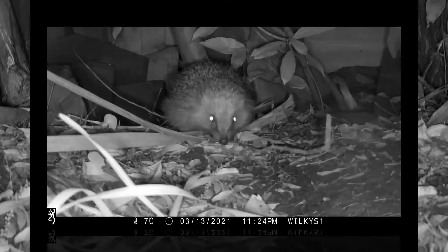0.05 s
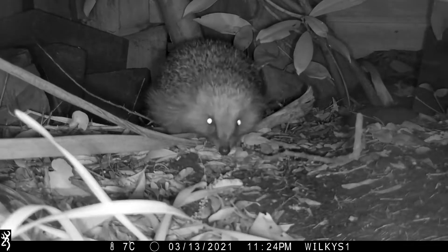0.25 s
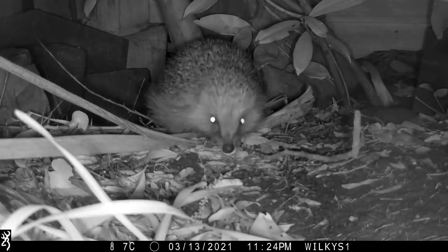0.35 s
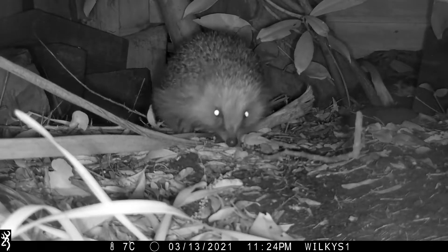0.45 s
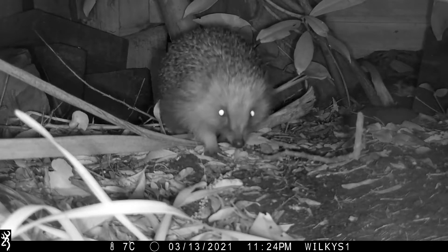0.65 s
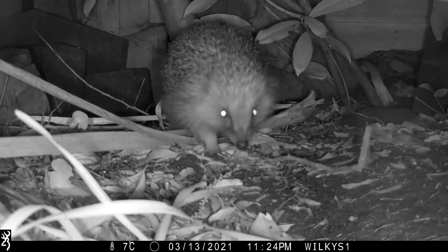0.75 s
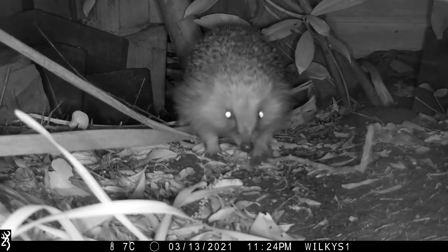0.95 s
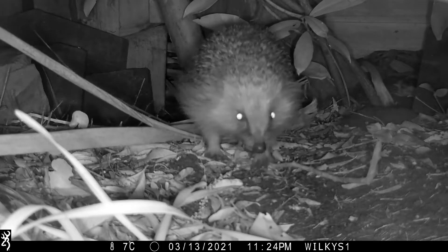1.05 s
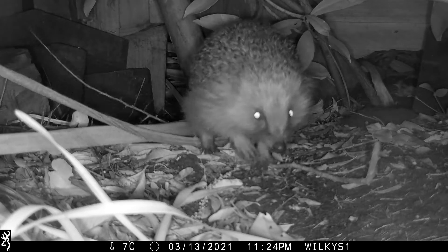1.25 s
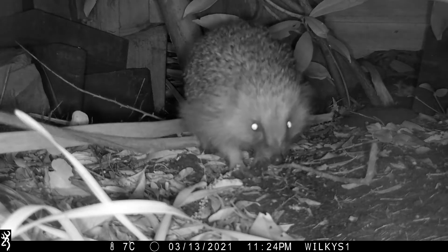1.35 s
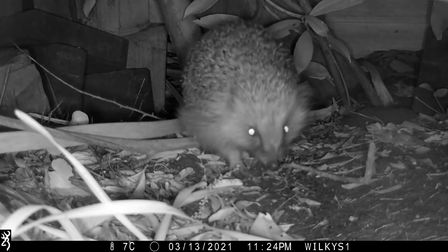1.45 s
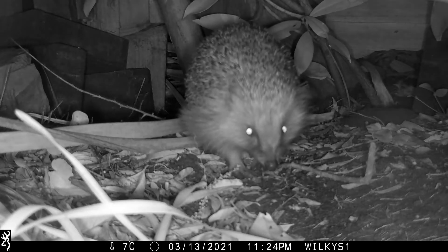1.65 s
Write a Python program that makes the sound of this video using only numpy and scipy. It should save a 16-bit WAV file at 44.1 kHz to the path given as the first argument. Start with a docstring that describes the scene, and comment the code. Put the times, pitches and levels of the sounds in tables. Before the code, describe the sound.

A hedgehog rustles through dry leaves close to a dull microphone. First a faint hiss fades, then cuts back in at about 0.2 seconds with a pop, a brief hum and a sharp click, and stays steady. From 0.3 to 0.9 seconds soft steps crackle, with tiny snaps and spines scraping leaves. After a short lull the rustling resumes around 1.1 seconds, peaks near 1.4 and thins out by 1.7.

```python
"""A hedgehog on dry leaf litter at night, close to a trail camera with a dull, hissy microphone.
The hiss fades away, then cuts back in with a pop, a brief hum and a sharp click, probably the camera's.
From 0.26 s the hedgehog walks: each footfall crushes leaves into a cloud of tiny cracks,
a few leaves and stalks snap, and spines scrape along the leaves."""
import sys
import numpy as np
from scipy import signal
from scipy.io import wavfile
from scipy.ndimage import uniform_filter1d

SR = 44100
rng = np.random.default_rng(int(sys.argv[2]) if len(sys.argv) > 2 else 0)


def to_wav(sig):
    """Store sig (one row per channel, or 1-D mono) as 16-bit WAV at the path in sys.argv[1].

    Samples outside -1..1 are clipped; the rate is SR.
    """
    pcm = np.clip(np.atleast_2d(sig), -1, 1) * 32767
    pcm = np.round(pcm).astype(np.int16)
    wavfile.write(sys.argv[1], SR, pcm.T)  # frames by channels


N = 74970

# presses on the litter (start [s], decay time [s], level [dB], treble gain [dB])
LEAF_PRESSES = [(0.263, 0.017, -43.5, 7), (0.274, 0.074, -50.5, -1.5), (0.48, 0.026, -52, 3),
                (0.499, 0.01, -53, 0), (0.556, 0.099, -55, -15), (.598, .012, -53, 7),
                (0.655, 0.017, -51, -4), (0.674, 0.029, -46, -1.5), (0.746, 0.033, -46.5, -1),
                (0.768, 0.034, -44.5, -6), (.88, 0.037, -52, -11), (1.164, 0.16, -53, -4),
                (1.252, 0.043, -50, 1), (1.3, 0.13, -51, 2.5), (1.356, 0.045, -49, 2),
                (1.388, 0.012, -36.5, -1), (1.403, 0.018, -44.5, 2), (1.426, 0.018, -46.5, 0),
                (1.478, 0.029, -56, 1.5), (1.531, 0.032, -54, -8)]
# colour of the tiny cracks (frequency [Hz], relative level [dB])
CRACK_SPECTRUM = [(100, -30.5), (500, -19), (1100, -3), (1800, -4.5), (2700, -1), (3250, -0.5), (3750, 1.5),
                  (4300, -7), (5000, -15), (6000, -28.5), (7000, -34.5), (8500, -35.5), (10300, -27.5),
                  (12500, -43), (15500, -49.5)]
# breaking leaves and stalks (time [s], crack gain [dB], ring level [dB], ring frequency [Hz])
SNAP_EVENTS = [(0.2665, -21.5, -26, 2960), (.2706, -27, -28.5, 3870), (0.2748, -16, -38, 3400),
               (0.4808, -38, -29.5, 1120), (0.4934, -10, -25, 990), (0.6918, -26, -32, 1340),
               (0.7664, -13, -20, 1380), (.7744, -14, -38, 2250), (1.3654, -29, -26, 1160),
               (1.3761, -19, -23, 3690), (1.3923, -38, -32.5, 2950), (1.4126, -24, -29.5, 3600),
               (1.4259, -19, -52, 2820)]
# colour of a snap's crack (frequency [Hz], gain [dB])
SNAP_SPECTRUM = [(100, -37), (500, -15.5), (900, 2.5), (2800, 3.5), (4000, -4), (5000, -13.5), (6200, -27),
                 (7500, -37.5), (10000, -28), (12500, -36), (15500, -44)]
# spines on leaves (start [s], length [s], level [dB], leaf resonance [Hz])
SPINE_SCRAPES = [(0.348, 0.011, -53.5, 3400), (0.419, 0.024, -52, 3600), (0.786, 0.014, -52, 3800),
                 (1.119, 0.012, -54, 3530), (1.158, 0.019, -52, 3650), (1.187, 0.023, -50.5, 3620),
                 (1.263, 0.083, -52, 3970), (1.402, 0.038, -49, 3830), (1.497, 0.027, -52, 3300),
                 (1.65, 0.019, -53, 3800), (1.658, 0.013, -59, 4330)]
# bright modes of the click (frequency [Hz], level [dB], T60 [s])
CAMERA_MODES = [(2570, -29.5, 0.025), (3050, 0, 0.0035), (3200, -28, 0.02), (3910, -14, 0.0049),
                (4550, -30.5, 0.009), (5240, -35.5, 0.005)]
# microphone hiss (frequency [Hz], relative density [dB])
HISS_SPECTRUM = [(25, -24), (50, -19.5), (90, -19), (140, -11.5), (300, -8.5), (450, -5), (620, -4),
                 (790, -1.5), (1250, -5), (1650, -8), (2900, -11), (3700, -9), (4200, -12.5), (4650, -25.5),
                 (5300, -33.5), (6500, -43.5), (8500, -48), (10400, -42.5), (12500, -47.5), (15500, -47)]
# resonances that make the hiss hollow (frequency [Hz], width [Hz], boost [dB])
HISS_RESONANCES = [(468, 31, 2), (630, 79, 4), (769, 25, 5.5), (903, 18, 3.5)]

TREBLE_SPLIT_HZ = 6500


def footfalls(cracks_per_s=2000, spread_db=4, rise_s=.003, decay_db=8.5):
    """Each press sets off tiny cracks that die away as the leaves settle; dry leaves are crisper."""
    t, body_power, treble_power = np.arange(N) / SR, np.zeros(N), np.zeros(N)
    for start_s, decay_s, level_db, treble_db in LEAF_PRESSES:
        age_s = np.maximum(t - start_s, 0)
        press = np.minimum(age_s / rise_s, 1) * amp(level_db - decay_db * (age_s / decay_s) ** 2)
        body_power += press ** 2
        treble_power += (press * amp(treble_db)) ** 2
    strengths = amp(spread_db * np.minimum(rng.exponential(1, N), 3)) * rng.choice([-1, 1], N)
    pulses = strengths * (rng.random(N) < cracks_per_s / SR)
    cracks = unit_rms(signal.fftconvolve(pulses, impulse_response(CRACK_SPECTRUM))[:N])
    body = lowpass(cracks, TREBLE_SPLIT_HZ)
    return body * np.sqrt(body_power) + (cracks - body) * np.sqrt(treble_power)


def snaps(ring_t60_s=.0072, scatter_s=.0034, scatter_db=-5, size=1500):
    """A crack, a short ring of the breaking piece, and scatter from the litter around it."""
    out, t = np.zeros(N), np.arange(size) / SR
    crack = impulse_response(SNAP_SPECTRUM)
    for time_s, crack_db, ring_db, ring_hz in SNAP_EVENTS:
        scatter = rng.standard_normal(size) * t * np.exp(-2 * t / scatter_s)
        excitation = (t == 0) + amp(scatter_db) * scatter / np.linalg.norm(scatter)
        add(out, time_s, amp(crack_db) * signal.fftconvolve(excitation, crack))
        add(out, time_s, ring([(ring_hz, ring_db, ring_t60_s)], rise_s=.00032))
    return out


def spine_scrapes(width_hz=650, size=8000):
    """Spines slide along a leaf: friction noise swells and fades in the leaf's resonance."""
    out, t = np.zeros(N), np.arange(size) / SR
    for start_s, length_s, level_db, leaf_hz in SPINE_SCRAPES:
        friction = rng.standard_normal(size)
        leaf = resonate(resonate(friction, leaf_hz, width_hz), leaf_hz, width_hz)
        swell = np.sqrt(abs(np.sin(np.pi * np.minimum(t / length_s, 1))))
        add(out, start_s, amp(level_db) * swell * unit_rms(lowpass(leaf, TREBLE_SPLIT_HZ)))
    return out


def camera_pop_and_hum(pop_at_s, pop_width_s=.00016, hum_at_s=.175, hum_length_s=.03, hum_hz=650):
    """A one-sided pulse, then a short tone that swells and fades."""
    out, t = np.zeros(N), np.arange(0, hum_length_s, 1 / SR)
    pop = t / pop_width_s * np.exp(1 - t / pop_width_s)
    swell = np.sin(np.pi * np.sqrt(t / hum_length_s))
    add(out, pop_at_s, amp(-31.5) * pop)
    add(out, hum_at_s, amp(-45) * swell * np.sin(2 * np.pi * hum_hz * t))
    return out


def camera_click(time_s=.2189, rise_s=.0005, rebound_s=.001217, rebound_db=-2.3, band_hz=(1100, 6200)):
    """A strike rings the housing; a quick, higher-pitched rebound follows."""
    out = np.zeros(N)
    housing_hz, housing_db, housing_t60_s = 1667, -21, .029
    click = ring(CAMERA_MODES + [(housing_hz, housing_db, housing_t60_s)], rise_s)
    add(click, rebound_s, amp(rebound_db) * ring(CAMERA_MODES, rise_s, pitch_ratio=1.108))
    add(out, time_s, signal.lfilter(*signal.butter(3, band_hz, "bandpass", fs=SR), click))
    return out


def microphone_hiss(level_db=-50.5, patch_db=1.5):
    """Dull, hollow noise, slightly patchy in time and frequency."""
    hz = np.fft.rfftfreq(1024, 1 / SR)
    real, imag, patches = rng.standard_normal((3, N // 256 + 6, len(hz)))
    patches = uniform_filter1d(patches, size=7, axis=0)
    patches = unit_rms(uniform_filter1d(patches, size=8, axis=1))
    frames = (real + 1j * imag) * amp(spectrum_db(HISS_SPECTRUM, hz) + patch_db * patches)
    hiss = signal.istft(frames.T, nperseg=1024, noverlap=768)[1][:N]
    hollow = sum((amp(boost_db) - 1) * resonate(hiss, peak_hz, width_hz)
                 for peak_hz, width_hz, boost_db in HISS_RESONANCES)
    return amp(level_db) * unit_rms(hiss + hollow)


def electronic_whine(level_db=-91.5, tone_hz=7796, wobble_hz=30, wobble_rad=1.8):
    """A faint high tone with a phase wobble."""
    t = np.arange(N) / SR
    wobble = wobble_rad * np.sin(2 * np.pi * wobble_hz * t)
    return amp(level_db) * unit_rms(np.sin(2 * np.pi * tone_hz * t + wobble))


def amp(db):
    """Decibels to gain."""
    return 10 ** (np.asarray(db) / 20)


def unit_rms(x):
    """Scales to rms 1."""
    return x / np.sqrt(np.mean(x ** 2) + 1e-20)


def spectrum_db(points, hz):
    """Interpolates a spectrum on a log-frequency axis."""
    points_hz, points_db = np.transpose(points)
    return np.interp(np.log(hz + 1), np.log(points_hz + 1), points_db)


def add(mix, start_s, sound):
    """Mixes a sound in at a time."""
    part = mix[max(round(start_s * SR), 0):][:len(sound)]
    part += sound[:len(part)]


def impulse_response(points, size=2048):
    """Minimum-phase pulse with the given spectrum."""
    log_gain = np.log(amp(spectrum_db(points, abs(np.fft.fftfreq(size, 1 / SR)))))
    response = np.exp(np.conj(signal.hilbert(log_gain)))
    return np.fft.ifft(response).real[:size // 2]


def ring(modes, rise_s, pitch_ratio=1, size=3000):
    """Damped modes with a soft start."""
    t = np.arange(size) / SR
    onset = 1 - np.exp(-(t / rise_s) ** 2)
    return onset * sum(amp(db) * 1000 ** (-t / t60_s) * np.sin(2 * np.pi * hz * pitch_ratio * t)
                       for hz, db, t60_s in modes)


def lowpass(x, cutoff_hz):
    """Zero-phase low-pass."""
    return signal.sosfiltfilt(signal.butter(4, cutoff_hz, fs=SR, output="sos"), x)


def resonate(x, hz, width_hz):
    """One resonance, peak gain 1."""
    return signal.lfilter(*signal.iirpeak(hz, hz / width_hz, fs=SR), x)


def scene(fade_s=.18, cut_in_s=.169):
    """The background fades and cuts back in; then the hedgehog walks. Mono."""
    t = np.arange(N) / SR
    fade = amp(-11) * np.maximum(1 - t / fade_s, 0) ** 1.95
    background = np.where(t < cut_in_s, fade, 1) * (microphone_hiss() + electronic_whine())
    camera = camera_pop_and_hum(cut_in_s) + camera_click()
    hedgehog = footfalls() + spine_scrapes() + snaps()
    return (hedgehog + camera + background)[None]


def record(dry):
    """Steep band limit."""
    cutoff_hz = 15750
    taps = signal.firwin(511, cutoff_hz, window=("kaiser", 9), fs=SR)
    return signal.oaconvolve(dry, taps[None], "same")


dry = scene()
out = record(dry)
to_wav(out)
```